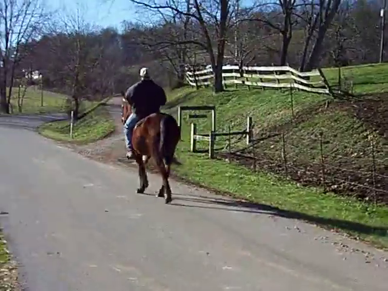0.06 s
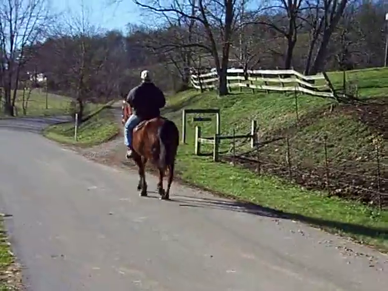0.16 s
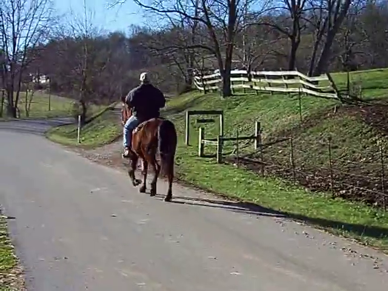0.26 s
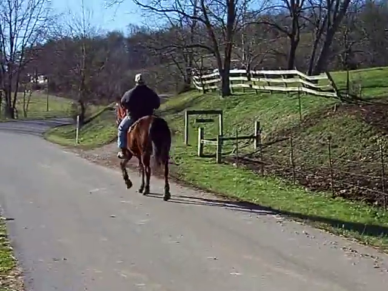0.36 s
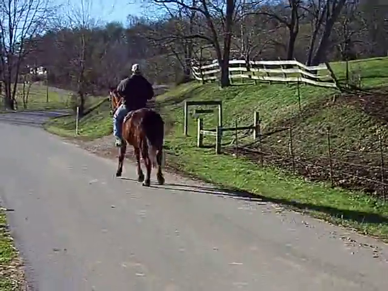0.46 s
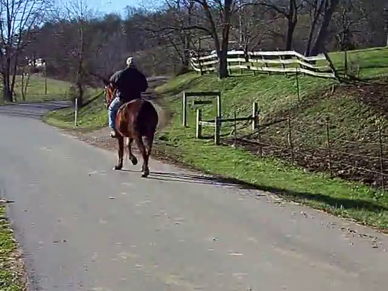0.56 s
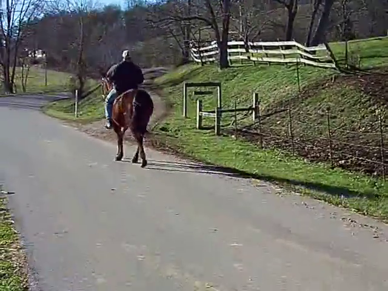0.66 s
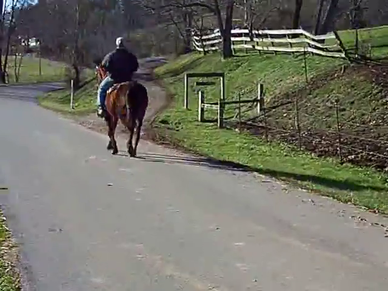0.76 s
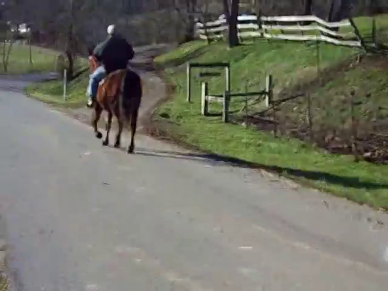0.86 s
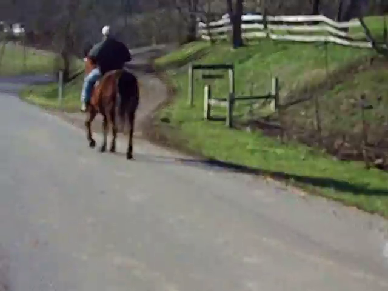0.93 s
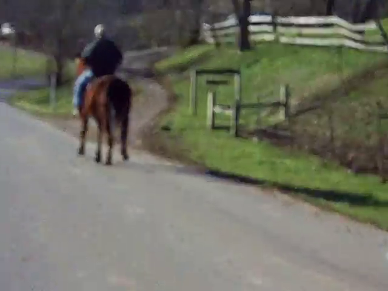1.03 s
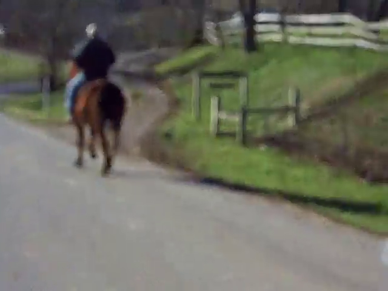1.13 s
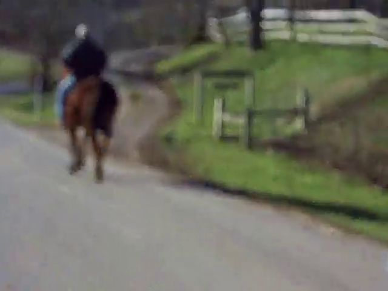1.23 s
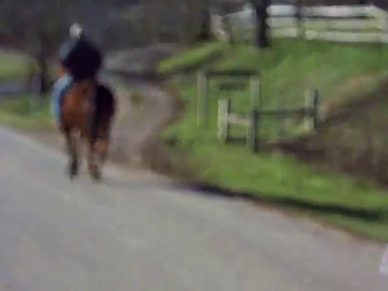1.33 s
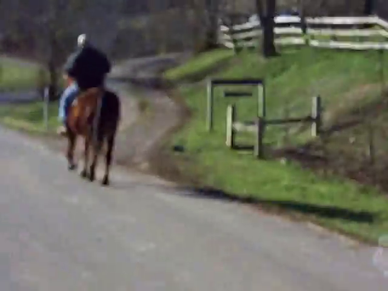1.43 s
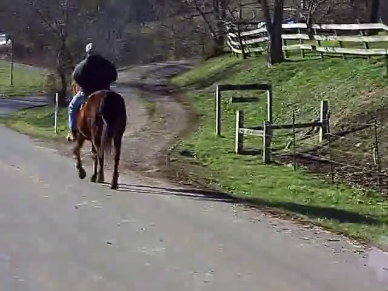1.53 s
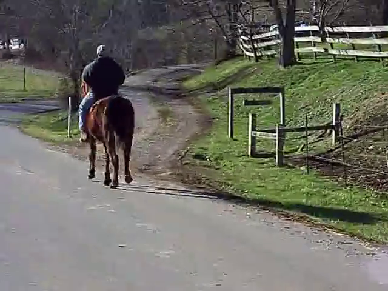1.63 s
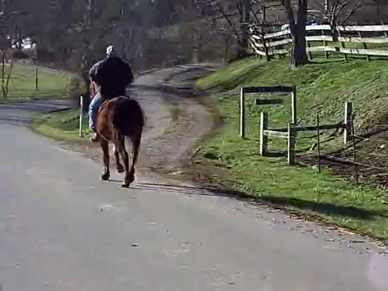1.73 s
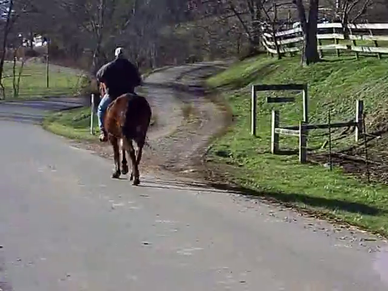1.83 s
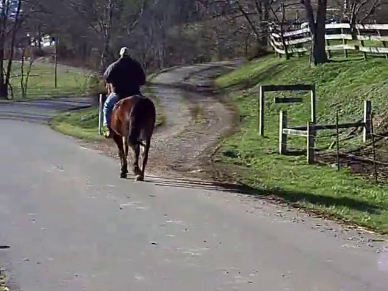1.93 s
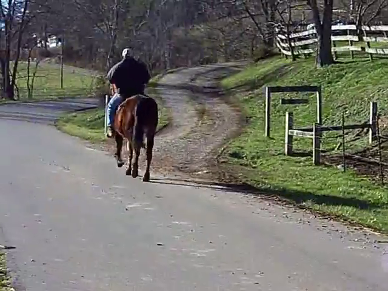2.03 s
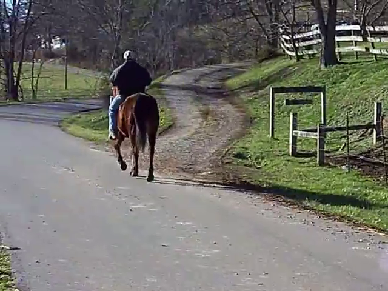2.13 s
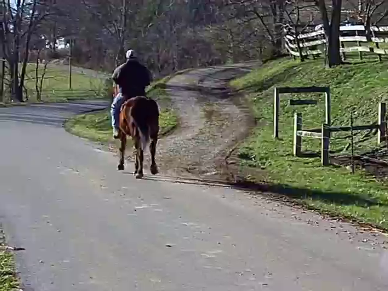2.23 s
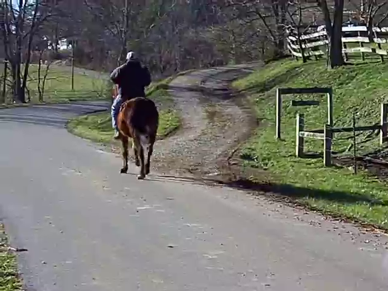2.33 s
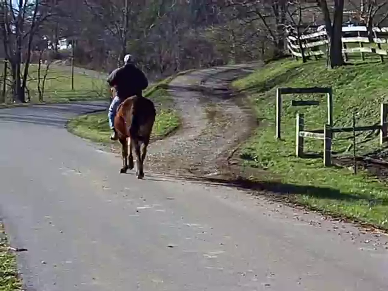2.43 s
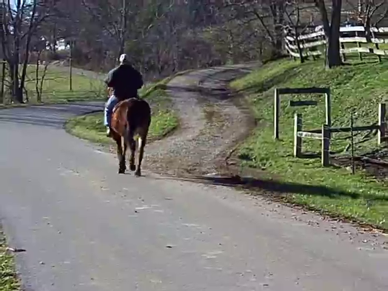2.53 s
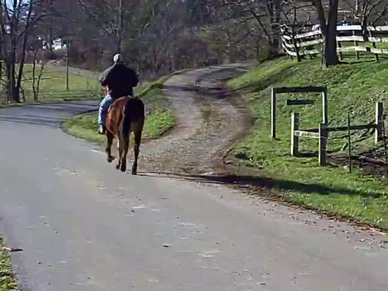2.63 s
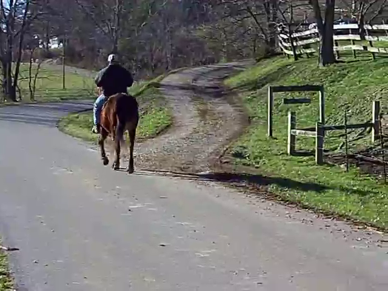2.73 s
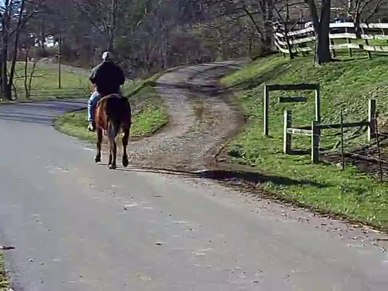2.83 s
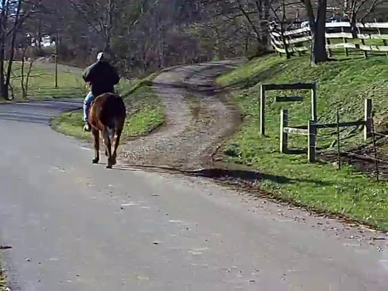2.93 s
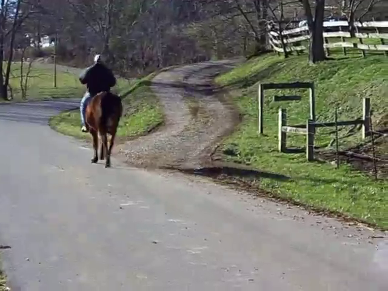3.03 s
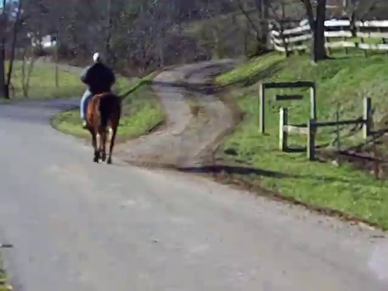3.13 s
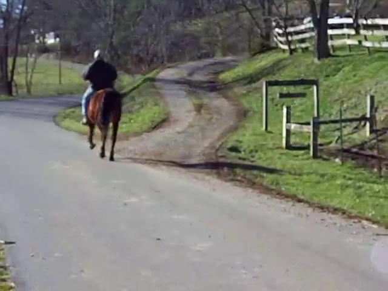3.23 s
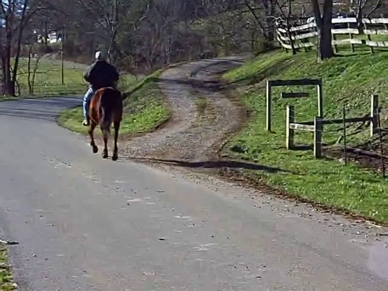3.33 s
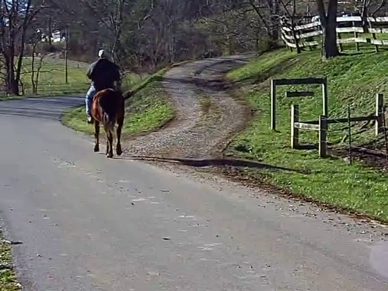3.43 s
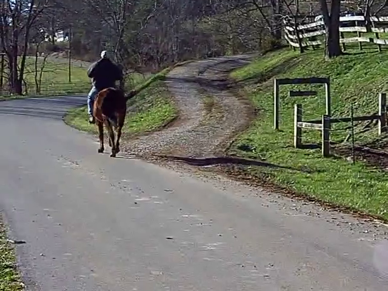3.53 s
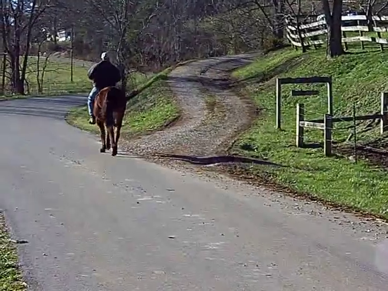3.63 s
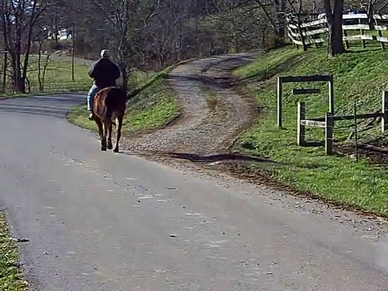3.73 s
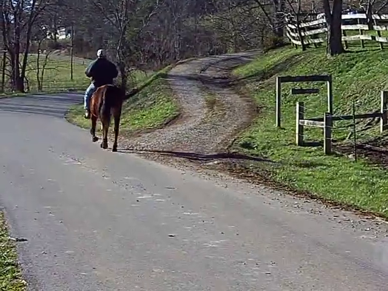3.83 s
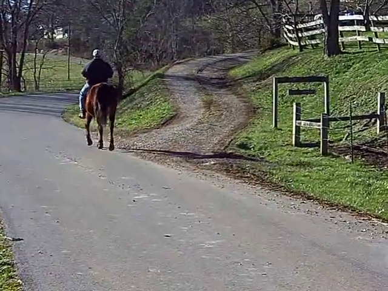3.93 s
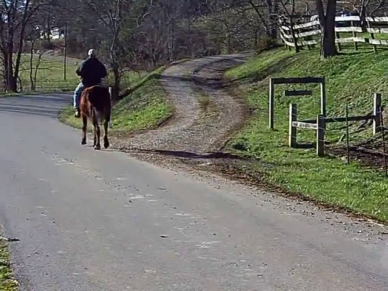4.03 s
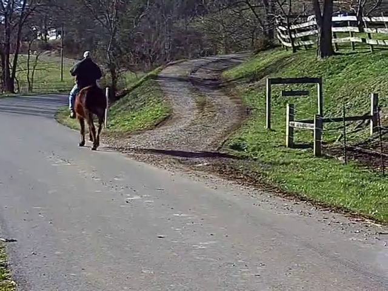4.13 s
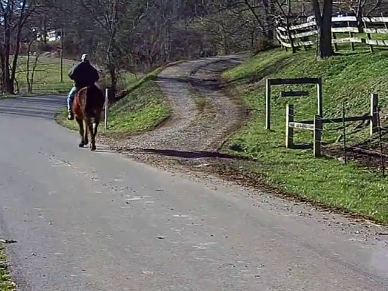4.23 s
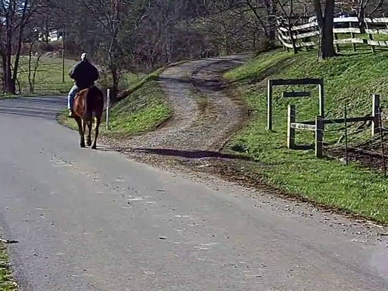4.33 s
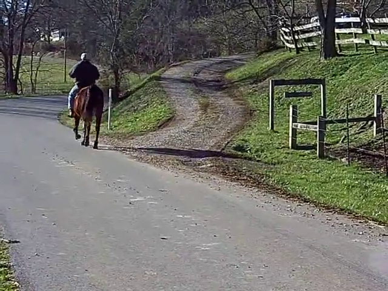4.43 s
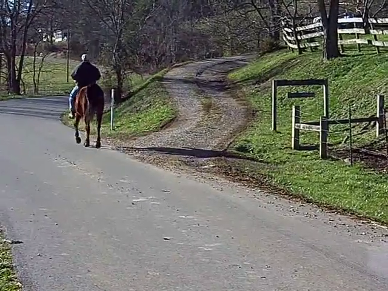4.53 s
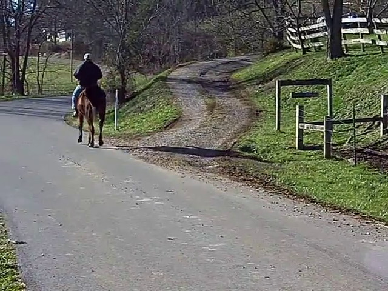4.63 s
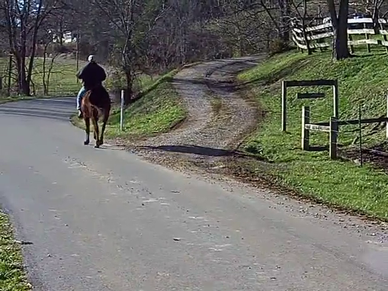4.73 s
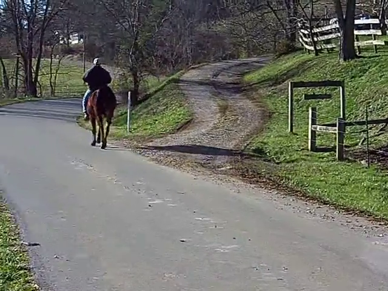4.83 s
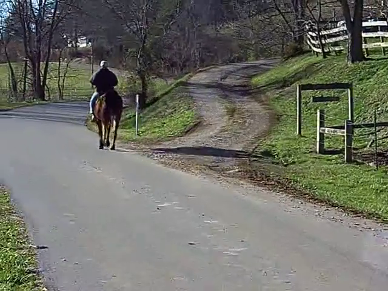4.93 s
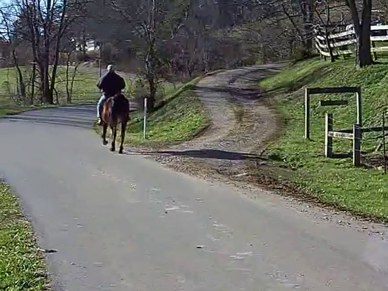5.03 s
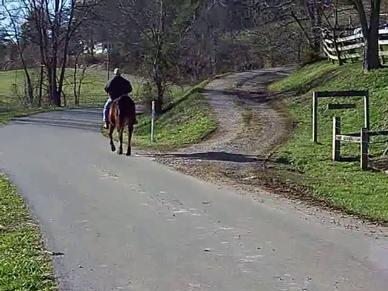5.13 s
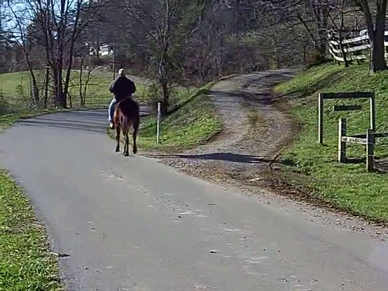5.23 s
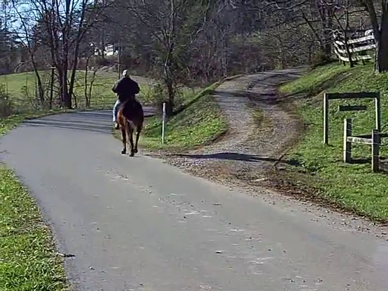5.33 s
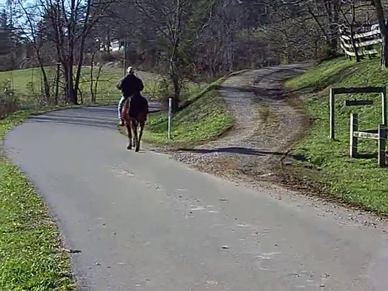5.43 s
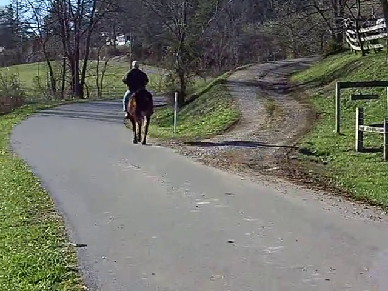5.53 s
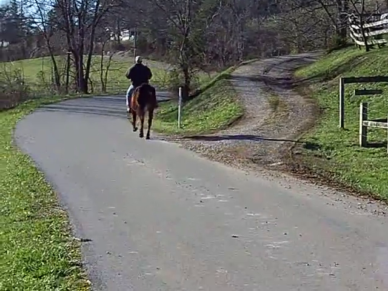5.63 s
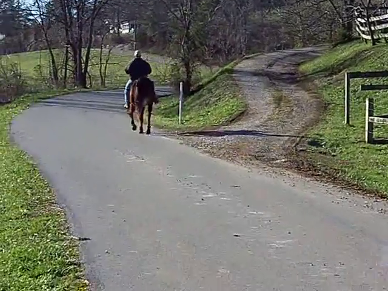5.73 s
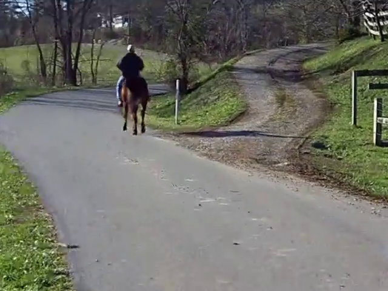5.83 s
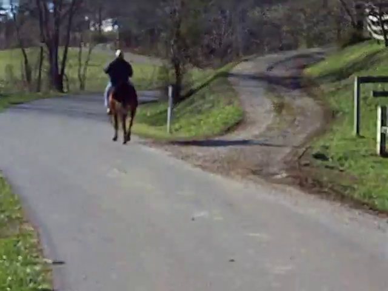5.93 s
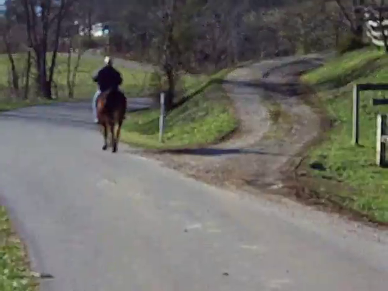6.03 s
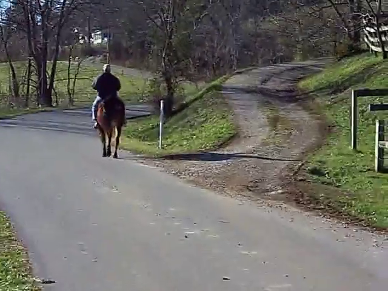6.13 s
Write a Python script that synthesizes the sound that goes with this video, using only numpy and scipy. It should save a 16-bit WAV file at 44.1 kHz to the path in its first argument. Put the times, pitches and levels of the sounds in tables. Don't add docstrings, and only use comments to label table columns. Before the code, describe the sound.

A single shod horse walks steadily away along a paved country road. One hoof of the four lands loudest, a hollow clop with gritty crunch, the others lighter taps, all fading gradually. A small hand-held camera microphone adds steady low hum, a thin throbbing high whistle and hiss. A zoom motor whirrs early and briefly near the end, among finger ticks, rubs and dull bumps.

```python
import sys
import numpy as np
from scipy import signal
from scipy.fft import rfft, irfft
from scipy.io import wavfile
from scipy.ndimage import uniform_filter1d

SR = 44100
rng = np.random.default_rng(int(sys.argv[2]) if len(sys.argv) > 2 else 0)


def inscribe(sig):
    pcm = np.round(np.clip(np.atleast_2d(sig).T, -1, 1) * 32767)
    wavfile.write(sys.argv[1], SR, pcm.astype(np.int16))


def field_ratio(decibels):
    return 10 ** (np.asarray(decibels, dtype=float) / 20)


N = 272538
TIME = np.arange(N) / SR

# freq_hz, density_db_per_hz
RUB_SPECTRUM = [(1500, -2.5), (3000, -10.5), (5000, -10.5), (6900, -2), (8500, -4.5)]
# freq_hz, density_db_per_hz
STONE_SPECTRUM = [(400, -10.5), (700, 9), (1100, 4.5), (2200, -7), (3400, -20.5), (7000, -15)]


def unit(x):
    return x / np.sqrt(np.mean(x ** 2))


def colour(x, points):
    size = 4096
    hz, db = np.transpose(points)
    log_hz = np.log(np.maximum(np.fft.rfftfreq(size, 1 / SR), 1))
    log_points = np.log(np.r_[hz[0] / 2, hz, hz[-1] * 2])
    gain_db = np.interp(log_hz, log_points, np.r_[db[0] - 20, db, db[-1] - 20])
    cepstrum = irfft(gain_db * np.log(10) / 20)
    cepstrum[1:size // 2] *= 2
    cepstrum[size // 2 + 1:] = 0
    impulse = irfft(np.exp(rfft(cepstrum)))
    return signal.fftconvolve(x, impulse)[:len(x)]


def walk(rate_hz):
    hold = int(SR / rate_hz)
    steps = np.repeat(rng.standard_normal(N // hold + 1), hold)
    return unit(uniform_filter1d(uniform_filter1d(steps, hold), hold)[:N])


def bell(centre_s, half_s):
    return np.exp(-((TIME - centre_s) / half_s) ** 2)


def burst(t60_s, rise_s):
    t = np.arange(SR // 8) / SR
    shape = (1 - np.exp(-(t / rise_s) ** 2)) * field_ratio(-60 * t / max(t60_s, 0.002))
    return shape / shape.max()


def ring(hz, t60_s, rise_s=0.00029):
    t = np.arange(SR // 8) / SR
    return -np.sin(2 * np.pi * hz * t) * burst(t60_s, rise_s)


def add(track, start_s, x):
    i = max(int(start_s * SR), 0)
    track[i:i + len(x)] += x[:max(len(track) - i, 0)]


def country_air():
    # freq_hz, density_db_per_hz
    air_spectrum = [(300, -16), (500, 1), (750, 0.5), (950, 0.5), (1250, -1), (2000, -10), (3300, -20),
                    (5500, -18), (8000, -21.5)]
    level_db = -68.5 + 4.5 + 1.4 * walk(20) + 0.4 * walk(4.3)
    return unit(colour(rng.standard_normal(N), air_spectrum)) * field_ratio(level_db)


def hand_rumble():
    # freq_hz, density_db_per_hz
    rumble_spectrum = [(10, -1), (30, 9), (80, -0.5), (150, -2), (280, -7), (400, -10), (800, -23.5)]
    # time_s, level_db
    hand = [(0, -57), (.6, -58), (.73, -55), (1.55, -54), (1.9, -62.5), (2.5, -60), (4.3, -61.5),
            (5.1, -60.5), (5.4, -56), (5.62, -56), (5.74, -51), (6.18, -60.5)]
    level_db = np.interp(TIME, *np.transpose(hand)) + 1 + 2.2 * walk(25) + 1.9 * walk(7.1)
    return unit(colour(rng.standard_normal(N), rumble_spectrum)) * field_ratio(level_db)


def mains_hum():
    # multiple, peak_db
    hum_partials = [(1, -38.5), (3, -91), (5, -71), (7, -71.5)]
    mains_hz, mains_rad = 59.98, -2.63
    phase = 2 * np.pi * mains_hz * TIME + mains_rad
    hum = sum(field_ratio(db) * np.cos(k * phase) for k, db in hum_partials)
    return hum * field_ratio(0.2 * walk(4.4))


def whistle():
    # time_s, slip_rad
    slip = [(0, 0), (2, -2.55), (2.7, -3.2), (3.9, -5.0), (4.5, -4.8), (5, -5.7), (6.2, -6.25)]
    # centre_s, half_length_s, level_db
    dips = [
        (0.666, .1, -14),
        (4.3, 0.086, -6),
        (4.663, 0.19, -4.5),
        (5.298, 0.18, -3),
        (5.7, 0.056, -4),
    ]
    whistle_hz, half_throb_hz, whistle_db, wander_db = 8000, 10, -53.5, 0.8
    dip_db = sum(db * bell(s, half) for s, half, db in dips)
    slip_rad = np.interp(TIME, *np.transpose(slip))
    throb = np.tanh(0.52 * np.cos(2 * np.pi * half_throb_hz * TIME + slip_rad))
    level_db = whistle_db + dip_db + wander_db * walk(9.5)
    return field_ratio(level_db) * throb * np.sin(2 * np.pi * whistle_hz * TIME)


def zoom_motor():
    # time_s, turns_so_far
    zoom_turns = [
        [(.760, 0), (.860, 4), (.956, 8), (1.052, 12), (1.146, 16), (1.217, 19), (1.267, 21), (1.379, 25)],
        [(5.748, 0), (5.851, 4), (5.923, 7), (5.977, 9), (6.063, 12)],
    ]
    # start_s, stop_s, gear_db, brush_hiss_db
    zoom_runs = [
        (0.766, 1.372, -62.5, -56.5),
        (5.74, 6.053, -63, -57.5),
    ]
    teeth_db = [0, -12, -13, -10, -16, -6]
    # freq_hz, width_hz, level_db
    gearbox = [(1050, 240, -3), (1250, 160, -7), (1480, 150, -4.5), (1780, 200, -4), (2120, 160, -6),
               (2430, 170, -1), (2620, 170, -2), (3150, 200, -6), (3400, 260, -5)]
    # freq_hz, density_db_per_hz
    brush_spectrum = [(4500, -13), (5300, -10), (6200, -12), (6700, -2), (7600, -3), (8500, -10)]
    surge_db, surge_s, run_out_db, run_out_s = 1.5, 0.017, -3, 0.08
    clicks, running = np.zeros(N), np.zeros(N)
    gear_db, hiss_db = np.full(N, -200.), np.full(N, -200.)
    for turns, (start_s, stop_s, run_gear_db, run_hiss_db) in zip(zoom_turns, zoom_runs):
        time_s, count = np.transpose(turns)
        tooth = np.arange(6 * count[-1]).astype(int)
        chance = rng.standard_normal((len(tooth), 2))
        click_s = np.interp(tooth / 6, count, time_s) - 0.001 + 0.00008 * chance[:, 0]
        clicks[(click_s * SR).astype(int)] = field_ratio(np.array(teeth_db)[tooth % 6] + 1.1 * chance[:, 1])
        on = (TIME >= start_s) & (TIME < stop_s)
        effort_db = (surge_db * bell(start_s, surge_s) + run_out_db * bell(stop_s, run_out_s))[on]
        running[on] = 1
        gear_db[on] = run_gear_db + effort_db
        hiss_db[on] = run_hiss_db + effort_db
    mesh = np.convolve(clicks, burst(0.015, 0.0005)[:600])[:N]
    rattle = unit((mesh + 0.08 * running) * rng.standard_normal(N))
    drive = unit(clicks) + field_ratio(-6) * rattle
    box = np.zeros(N)
    for k, (hz, width_hz, db) in enumerate(gearbox):
        mode = signal.lfilter(*signal.iirpeak(hz, hz / width_hz, SR), drive)
        box += (-1) ** k * field_ratio(db) * mode
    brushes = colour((np.sqrt(mesh) + 0.22 * running) * rng.standard_normal(N), brush_spectrum)
    gear_gain = uniform_filter1d(field_ratio(gear_db + 12.5), size=130)
    hiss_gain = uniform_filter1d(field_ratio(hiss_db + 7.0), size=130)
    return np.sqrt(running.mean()) * (unit(box) * gear_gain + unit(brushes) * hiss_gain)


def skin_rub():
    # centre_s, half_length_s, level_db
    strokes = [(0.122, 0.053, -58), (0.542, .15, -58), (1.527, 0.095, -63.5), (1.72, 0.072, -60),
               (1.993, 0.035, -77), (2.29, 0.088, -76), (2.675, 0.059, -77), (4.106, 0.035, -66),
               (4.37, .03, -79), (4.72, 0.089, -71.5), (4.986, 0.034, -65), (5.257, 0.6, -82),
               (5.41, 0.027, -69)]
    grip_db = -73.5
    pressure = field_ratio(grip_db) + sum(field_ratio(db) * bell(s, half) for s, half, db in strokes)
    rub = unit(colour(rng.standard_normal(N), RUB_SPECTRUM))
    return rub * pressure * field_ratio(-0.5 + 2.3 * walk(40))


def finger_ticks():
    # start_s, peak_db, freq_hz, low_part_rel_db, t60_s
    ticks = [(0.156, -28, 6500, -9.5, 0.015), (1.0874, -35, 6840, -10, 0.0091),
             (1.2486, -24.5, 7050, -9.5, 0.01), (1.2672, -28, 7900, -2.5, 0.004),
             (1.352, -62, 7300, 8, 0.0065), (1.953, -49.5, 6760, -13, 0.013),
             (2.5462, -57, 6460, 0, 0.0098), (3.557, -54, 7500, 0, 0.012), (4.807, -37.5, 7430, -9, 0.0089),
             (4.841, -43, 7500, 0.5, 0.011), (5.0837, -45.5, 7160, -19, 0.0036),
             (5.4317, -47, 7360, -22, 0.0086), (5.537, -51, 7600, -1, 0.015),
             (5.669, -45.5, 7200, -16, 0.0056), (5.7419, -44, 6500, 3.5, 0.033),
             (5.9463, -31, 6150, 2, 0.0027), (6.101, -57, 8050, -25, 0.013)]
    out = np.zeros(N)
    for start_s, db, hz, low_db, t60_s in ticks:
        noise = rng.standard_normal((2, SR // 8))
        high = unit(colour(noise[0], [(0.73 * hz, -14), (hz, 0), (1.16 * hz, -8)]))
        low = unit(colour(noise[1], [(1200, -0.5), (2500, -3.5), (3500, -5.5)]))
        add(out, start_s, field_ratio(db - 2) * (high + field_ratio(low_db) * low) * burst(t60_s, 0.00032))
    return out


def hand_bumps():
    # start_s, peak_db, freq_hz, t60_s
    bumps = [(0.279, -49.5, 210, 0.059), (0.544, -46.5, 101, 0.08), (1.179, -43, 119, 0.11),
             (1.545, -63, 101, 0.057), (1.859, -41.5, 174, 0.047), (2.859, -44, 186, 0.031),
             (3.585, -49.5, 388, 0.063), (4.109, -51.5, 144, 0.058), (4.802, -63, 180, 0.072),
             (5.404, -39.5, 104, 0.015), (5.708, -49.5, 385, 0.13), (5.744, -41, 109, 0.042)]
    out = np.zeros(N)
    for start_s, db, hz, t60_s in bumps:
        case = field_ratio(-2) * ring(340, 0.021, rise_s=0.0038)
        add(out, start_s, field_ratio(db) * (ring(hz, t60_s, rise_s=0.0015) + case))
    return out


def toes():
    # start_s, peak_db, freq_hz
    touches = [(0.1804, -40, 1300), (0.78, -55, 1100), (1.9626, -39, 1500), (2.5594, -40, 1200),
               (2.692, -55, 2400), (2.717, -55, 1070), (2.864, -40.5, 470), (2.371, -54, 2210),
               (2.392, -54, 2300), (3.001, -49.5, 1500), (3.1611, -47, 1300), (3.556, -49.5, 824),
               (3.7662, -35, 1200), (4.3419, -35, 1300), (4.947, -43, 1500), (5.415, -46, 900),
               (5.455, -48, 956), (5.5574, -47, 1190), (5.622, -47.5, 1010), (5.716, -49, 860),
               (4.092, -42, 1200), (4.105, -50, 2220)]
    out = np.zeros(N)
    for start_s, db, hz in touches:
        grains = unit(colour(rng.standard_normal(SR // 8), STONE_SPECTRUM)) * burst(0.021, 0.001)
        add(out, start_s, field_ratio(db) * (field_ratio(-1.5) * ring(hz, 0.015) + field_ratio(-9.5) * grains))
    return out


def hoof_fall(out, fall, hoof):
    # freq_ratio, level_db, t60_s
    horn_modes = [(0.982, -1, 0.007), (1.266, -10, 0.011), (0.816, -8, 0.008)]
    # freq_hz, level_db, t60_s
    thud_modes = [(270, 3.5, 0.037), (430, -1, 0.013)]
    # lag_s, level_db
    bounces = [
        (.0076, -2),
        (0.015, -9.5),
    ]
    contact_s, slide_s = 0.0007, 0.0061
    horn_spread, step_spread_db, bounce_spread_db = 0.05, 2, 1.5
    rim_hz, rim_t60_s, rim_follows = 1140, 0.0062, 0.9
    scuff_db = -24.5
    start_s, db, hollow_hz, t60_s, horn_db = fall
    horn_hz, rebound_db, rim_db, scuff, slide_db = hoof
    noise = rng.standard_normal((3, SR // 8))
    step = rng.standard_normal(4)

    grit_db = -32.5 + 0.35 * db - 2 * start_s + step_spread_db * step[1]
    thud_db = -29 + 0.64 * db - 0.82 * start_s + step_spread_db * step[2]
    grit = unit(colour(noise[0], RUB_SPECTRUM)) * burst(0.008, 0.00076)
    blow = field_ratio(db) * ring(hollow_hz, t60_s) + field_ratio(grit_db) * grit

    step_horn_hz = horn_hz * (1 + horn_spread * step[0])
    horn = sum(field_ratio(g) * ring(min(k * step_horn_hz, 3600), d, rise_s=0.00035) for k, g, d in horn_modes)
    rim_level_db = db + rim_db + rim_follows * horn_db + step_spread_db * step[3]
    knock = field_ratio(db + horn_db) * horn + field_ratio(rim_level_db) * ring(rim_hz, rim_t60_s)
    thud = sum(field_ratio(g) * ring(hz, d, rise_s=0.00057) for hz, g, d in thud_modes)
    add(out, start_s + contact_s, blow + knock + field_ratio(thud_db) * thud)

    for lag_s, bounce_db in bounces:
        chance = rng.standard_normal(2)
        level_db = rebound_db + bounce_db + bounce_spread_db * chance[1]
        add(out, start_s + lag_s + 0.0003 * chance[0], field_ratio(level_db) * (blow + knock))

    skim_len = int(slide_s * SR)
    skim = unit(colour(noise[1, -skim_len:], RUB_SPECTRUM)) * np.sqrt(np.arange(skim_len) / skim_len)
    add(out, start_s + contact_s - slide_s, field_ratio(grit_db + slide_db) * skim)

    stones = unit(colour(noise[1] * (noise[2] > 1.8), STONE_SPECTRUM)) * burst(0.038, 0.0021)
    add(out, start_s - 0.0015, np.clip(scuff, 0, 1) * field_ratio(db / 2 + scuff_db) * stones)


def field_returns(falls):
    # freq_hz, density_db_per_hz
    field_spectrum = [(400, -10), (900, 8.5), (1500, -7.5), (2700, 0), (3600, -15)]
    field_db, field_t60_s = -54, 0.3
    hill_s, hill_spread_s, hill_db = 0.21, 0.05, -20.5
    t = np.arange(SR // 2) / SR
    near = field_ratio(-120 * t / field_t60_s) * np.minimum(t / 0.0067, 1)
    hill = field_ratio(hill_db) * np.exp(-((t - hill_s) / hill_spread_s) ** 2)
    energy = signal.fftconvolve(falls ** 2, near + hill)[:N]
    wash = unit(colour(rng.standard_normal(N), field_spectrum))
    return field_ratio(field_db) * np.sqrt(np.abs(energy)) * wash


def hooves():
    # start_s, peak_db, hollow_hz, t60_s, horn_knock_rel_db
    left_hind = [(0.1825, -12.5, 846, 0.02, -5.5), (0.784, -13.5, 870, 0.011, -9),
                 (1.377, -12.5, 860, 0.014, -3.5), (1.965, -13, 960, 0.0087, -18),
                 (2.566, -15.5, 1000, 0.0056, -11.5), (3.167, -19.5, 924, 0.01, -4),
                 (3.7674, -18, 906, 0.011, -6), (4.346, -21, 1030, 0.0053, -16),
                 (4.954, -20.5, 905, 0.0075, -8), (5.562, -22.5, 994, 0.011, -11.5),
                 (6.17, -20.5, 914, 0.0065, -14)]
    left_fore = [(0.306, -32.5, 1040, 0.0027, -6), (0.901, -14, 923, 0.0079, -8),
                 (1.493, -31, 1100, 0.0053, -9), (2.089, -30, 830, 0.0032, -8.5),
                 (2.697, -28, 980, 0.022, -22), (3.301, -35.5, 1070, 0.013, 0),
                 (3.892, -41, 1074, 0.019, 1.5), (4.48, -44.5, 1120, 0.022, 4.5),
                 (5.092, -38, 1077, 0.026, 3.5), (5.697, -40.5, 950, 0.015, 2.5)]
    right_hind = [(0.496, -26.5, 690, .007, -1), (1.087, -47, 956, .011, 4),
                  (1.694, -37.5, 1196, 0.017, -1), (2.286, -29, 1090, 0.01, -10),
                  (2.877, -25.5, 980, 0.013, -7), (3.477, -32.5, 1120, 0.03, -35),
                  (4.083, -35, 900, 0.0054, 0), (4.674, -30, 1040, 0.021, 4),
                  (5.28, -37.5, 1100, 0.023, -7), (5.874, -33, 1110, 0.02, -9)]
    right_fore = [(0.031, -34.5, 1210, 0.0072, -4.5), (0.607, -35.5, 1290, .016, -11),
                  (1.211, -37.5, 1270, 0.02, -6), (1.548, -44, 899, 0.011, 6.5),
                  (1.807, -54, 890, 0.012, 12), (1.863, -50.5, 1400, 0.05, 10.5),
                  (2.407, -51, 1250, 0.03, -19), (3.011, -44, 1260, .013, -1.5),
                  (3.593, -46.5, 825, 0.013, 4.5), (4.805, -40.5, 1140, .0083, -11),
                  (5.407, -48, 1300, 0.0085, 2), (6.015, -41.5, 1020, 0.0076, 5)]
    # horn_hz, heel_rebound_rel_db, rim_ring_rel_db, scuff_0_to_1, slide_rel_db
    hoof_traits = [
        (2130, -16.5, -4.5, 0.73, -16.5),
        (1795, -13.5, -6.5, 0.35, -2),
        (1954, -14.5, -4.5, 0.84, -8),
        (1890, -9, -3.5, 0.67, -16.5),
    ]
    out = np.zeros(N)
    for falls, hoof in zip((left_hind, left_fore, right_hind, right_fore), hoof_traits):
        for fall in falls:
            hoof_fall(out, fall, hoof)
    return out + field_returns(out)


def scene():
    background = country_air() + hand_rumble() + mains_hum() + whistle()
    handling = zoom_motor() + skin_rub() + finger_ticks() + hand_bumps()
    return (background + handling + toes() + hooves())[None, :]


def roll_off(x):
    return signal.sosfilt(signal.butter(12, 9180, fs=SR, output="sos"), x)


def record(dry):
    # freq_hz, gain_db
    port = [(20, -2), (3500, -0.5), (3750, -8), (4200, -20.5), (4600, -8), (6300, -3), (7000, 0),
            (8300, -5), (8800, -24.5), (9400, -43)]
    preamp_db = -74
    hiss = colour(rng.standard_normal(N), [(100, -1.5), (8000, 0.0), (8800, -26.0), (9400, -59.5)])
    mix = colour(dry[0], port) + field_ratio(preamp_db) * hiss
    return roll_off(mix[None, :])


dry = scene()
out = record(dry)
inscribe(out)
```